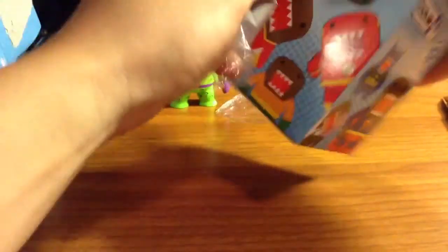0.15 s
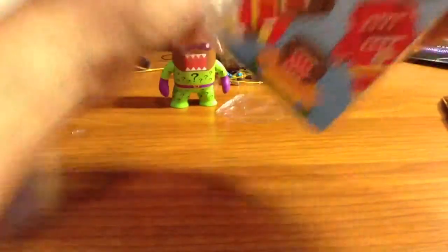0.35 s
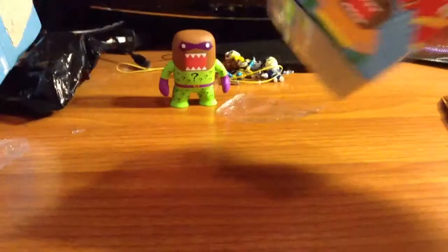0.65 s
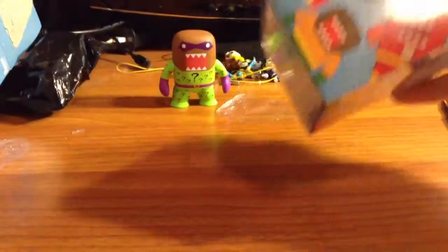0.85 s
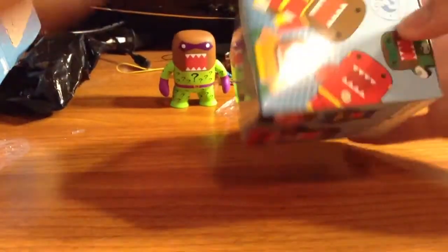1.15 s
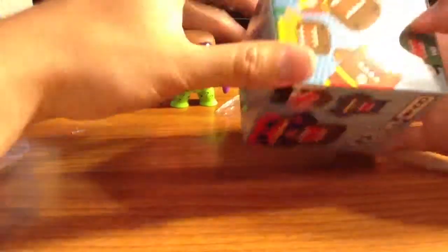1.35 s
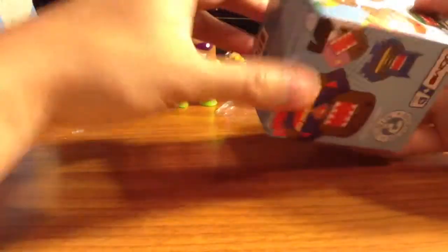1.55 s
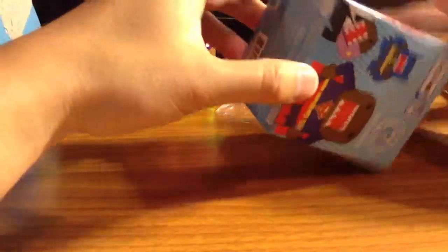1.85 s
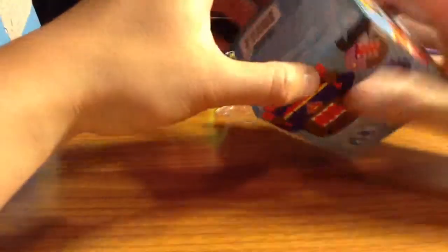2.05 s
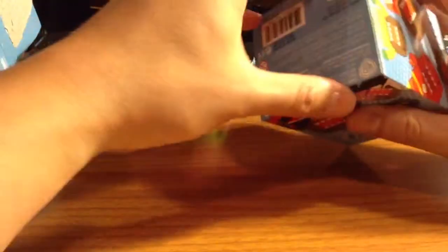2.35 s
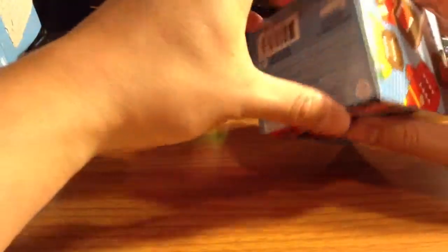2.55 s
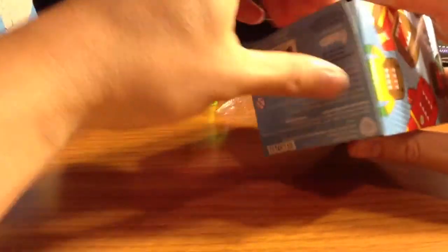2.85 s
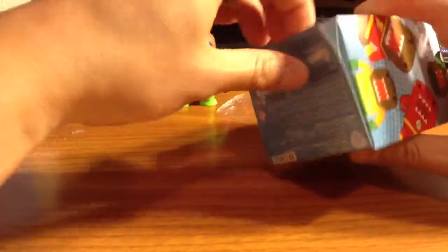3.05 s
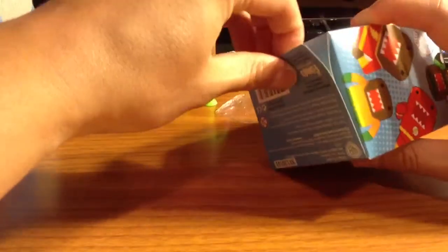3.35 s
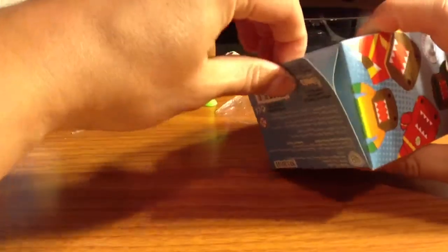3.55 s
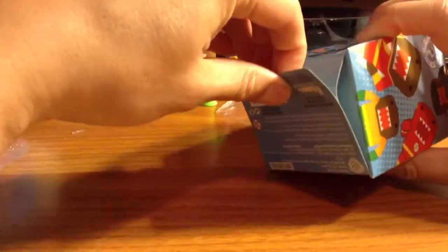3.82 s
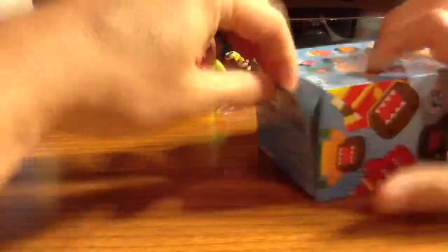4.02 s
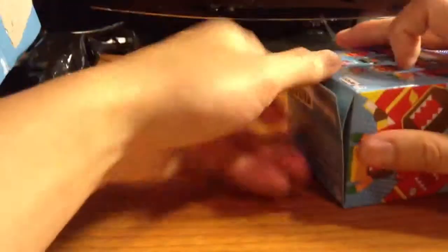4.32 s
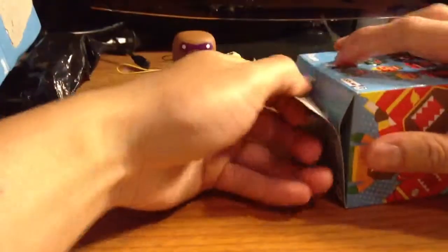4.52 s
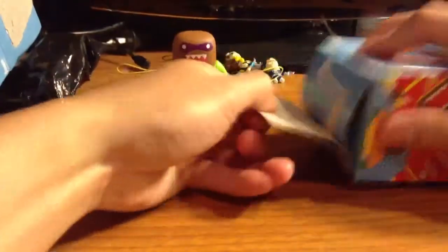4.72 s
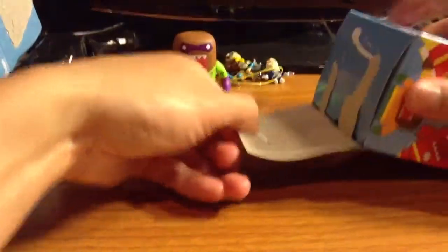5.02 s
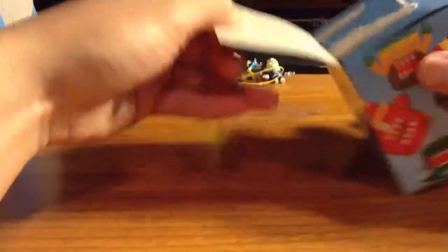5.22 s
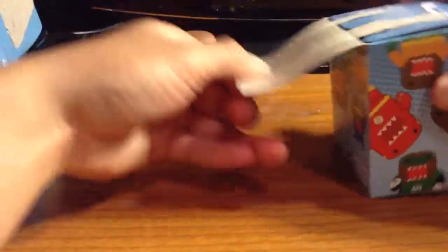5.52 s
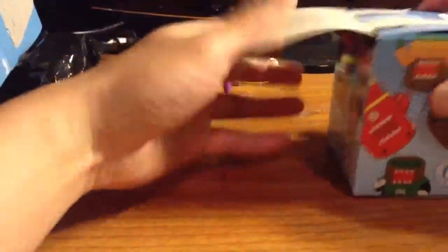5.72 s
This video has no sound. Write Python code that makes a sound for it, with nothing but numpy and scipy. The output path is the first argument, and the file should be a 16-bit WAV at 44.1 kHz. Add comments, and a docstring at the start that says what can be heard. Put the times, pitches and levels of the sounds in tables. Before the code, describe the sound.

Busy plastic crackling, quiet box handling and thumb picks, a sharp snap with a pop, hollow thuds, then a loud two-part cardboard tear.

```python
"""In a small room, close by, hands pull crinkly film off a cardboard box and rip open its glued flap.
Creases, picked edges and glue spots snap as noise bursts; blows ring the modes of the hollow box.
Rubbing is grainy friction noise heard through film, card and box; the freed flap hisses and rings, and once pops.
Near surfaces echo, a decaying noise tail gives the room's answer, and quiet room tone lies beneath."""
import sys
import numpy as np
from scipy import signal
from scipy.fft import rfft, irfft, next_fast_len
from scipy.io import wavfile
from scipy.ndimage import map_coordinates

SR = 44100
rng = np.random.default_rng(int(sys.argv[2]) if len(sys.argv) > 2 else 0)


def wrap_up_sound(samples):
    """Save the sound to the file named by the first command line argument, as 16-bit audio."""
    columns = np.atleast_2d(samples).T
    # keep every value between -1 and 1, then stretch to whole-number steps
    tamed = np.clip(columns, -1, 1)
    steps = np.round(tamed * 32767).astype(np.int16)
    wavfile.write(sys.argv[1], SR, steps)


N = 259308  # length in samples


def amp(db):
    """Decibel law: 20 dB is a factor of ten in amplitude."""
    return 10 ** (np.asarray(db) / 20)


def unit(x):
    """Normalisation to a root-mean-square value of one."""
    return x / np.sqrt(np.mean(x ** 2) + 1e-20)


def along(points, hz):
    """Logarithmic pitch scale: (Hz, value) points joined by straight lines over log frequency."""
    point_hz, value = np.transpose(points)
    return np.interp(np.log(hz + 1), np.log(point_hz + 1), value)


def filtered(x, response):
    """Linear filtering: the zero-padded spectrum times a complex response of frequency."""
    size = next_fast_len(N + 8192)
    hz = np.fft.rfftfreq(size, 1 / SR)
    return irfft(rfft(x, size) * response(hz), size)[:N]


def coloured(x, spectrum):
    """Spectral shaping: a zero-phase gain drawn through (Hz, dB) points."""
    return filtered(x, lambda hz: amp(along(spectrum, hz)))


def resonant(x, peaks):
    """Parallel resonance: second-order band-passes (Hz, width Hz, dB) added with alternating sign."""
    def response(hz):
        total = 0
        for k, (centre, width, db) in enumerate(peaks):
            damping = 1j * hz * width
            total = total + (-1) ** k * amp(db) * damping / (centre ** 2 - hz ** 2 + damping)
        return total
    return filtered(x, response)


def wobble(rate):
    """Slow random modulation: a smooth curve through normal deviates, rate knots a second."""
    knots = rng.standard_normal(int(N * rate / SR) + 4)
    return map_coordinates(knots, [np.arange(N) * rate / SR])


def grainy(per_s, spread_db, t60, smooth):
    """Stick-slip friction: noise lit by random slips of bounded size, each dying in t60 s, over a smooth share."""
    chance, size, noise = rng.random(N), rng.exponential(size=N), rng.standard_normal(N)
    slips = (chance < per_s / SR) * amp(spread_db * np.minimum(size, 3))
    decay_per_sample = amp(-60 / (t60 * SR))
    glow = signal.lfilter([1], [1, -decay_per_sample], slips)
    return noise * (unit(glow) + smooth)


# Room tone spectrum. Each row: frequency in Hz, relative level in dB.
AIR_SPECTRUM = [(25, -34), (60, -16.5), (125, -4.5), (260, 4.5), (500, -3.5), (1300, -9.5), (2500, -14.5),
                (8000, -27.5), (17000, -25)]


def room_tone():
    """Steady broadband noise: shaped by the room-tone spectrum, its level wandering a little."""
    level_db = -59.5 + 2.34 * wobble(5.29)
    return amp(level_db) * unit(coloured(rng.standard_normal(N), AIR_SPECTRUM))


# Reverberation. Each row: frequency in Hz, time to fall 60 dB in seconds.
ROOM_T60 = [(200, 0.18), (1000, 0.17), (3000, 0.18), (8000, 0.27), (15000, 0.11)]
# Table top and near walls. Each row: delay in seconds, level in dB before the echo's treble tilt.
WALLS = [(.0023, -18), (.0047, -24), (0.01, -27.5), (0.0132, -28.5), (.0231, -44)]


def room(x, wet_db):
    """Reflection and reverberation: discrete echoes, then a decaying noise tail, drawn anew each quarter second."""
    out, step = np.zeros(N + SR), SR // 4
    out[:N] = x
    bright_echo = coloured(x, [(300, -68), (3000, 7.5)])
    for delay, db in WALLS:
        out[round(delay * SR):][:N] += amp(db) * bright_echo
    for k in range(0, N, step):
        hz, t, bins = signal.stft(rng.standard_normal(SR // 3), SR, nperseg=256)
        fading = bins * amp(-60 * t / along(ROOM_T60, hz)[:, None])
        tail = signal.istft(fading, SR, nperseg=256)[1]
        wet = signal.fftconvolve(x[k:k + step], tail / np.linalg.norm(tail))
        out[k + SR // 200:][:len(wet)] += amp(wet_db) * wet  # 5 ms later
    return out[:N]


# Resonances of the bent flap. Each row: frequency in Hz, width in Hz, relative level in dB.
CARD_PEAKS = [(1500, 920, 5), (2470, 413, 8.5), (3144, 785, 5.5)]


def card(x):
    """Plate resonance: the card passes sound through its own broad peaks."""
    return resonant(x, CARD_PEAKS)


# Colour of film crackle. Each row: frequency in Hz, relative level in dB.
FILM_SPECTRUM = [(1500, -48), (2600, -5), (3300, -11), (4800, 0), (7000, 0.5), (10000, 1), (13000, 1),
                 (17000, -4.5)]


def sliding(grit):
    """Radiation by the rubbed sheet: friction grit heard through film (rustle) and through card (rasp)."""
    rustle = amp(-5.5) * unit(coloured(grit, FILM_SPECTRUM))
    rasp = amp(-6.0) * unit(card(grit))
    return np.array([rustle, rasp])


# Hands resting and shifting on the box.
# Each row: time in seconds, relative rustle in dB, relative box rumble in dB.
HOLD = [(0, -45.5, -48), (0.5, -51.5, -58), (0.9, -57.5, -62.5), (1.12, -63.5, -78), (1.8, -65, -62),
        (2.3, -71.5, -63), (2.7, -74, -68), (3.0, -56, -49), (3.15, -56, -51), (3.3, -60, -54.5),
        (3.7, -55.5, -52.5), (3.9, -57, -55.5), (4.4, -59.5, -56), (4.63, -62.5, -57.5),
        (5.04, -56.5, -51.5), (5.15, -50, -52.5), (5.42, -55.5, -52.5), (5.6, -56, -57.5),
        (5.88, -54.5, -50.5)]
# Pulls and rubs. Each row: start in seconds, length in seconds, relative rustle in dB,
# relative box rumble in dB, paper rasp in dB above the rustle.
STROKES = [(0, 0.033, -36, -30.5, -12), (0.097, .12, -56, -38.5, -6), (0.226, 0.041, -27, -50, -11),
           (0.284, 0.1, -36.5, -43.5, 0.5), (0.357, 0.098, -33.5, -35.5, -3.5),
           (0.546, 0.13, -34.5, -44.5, -5.5), (0.66, 0.17, -43, -54, -3.5), (1.013, 0.069, -56, -51, 8),
           (1.302, 0.13, -63, -45.5, 8), (1.592, 0.16, -69.5, -54, 11), (1.86, 0.14, -56.5, -47, 4),
           (1.97, .26, -54, -44.5, 2.5), (2.473, 0.022, -59, -72, 4.5), (3.77, 0.054, -56.5, -61, 4),
           (3.95, 0.11, -46, -44.5, -5), (4.02, .09, -56, -37, -2), (4.189, 0.073, -52, -49, 1.5),
           (4.532, 0.056, -50, -46.5, -3), (5.692, 0.11, -49, -41, 7)]
# The glued seam rips in two pulls. Each row: start in seconds, length in seconds, relative rustle in dB,
# relative box rumble in dB, paper rasp in dB above the rustle.
RIPS = [(4.68, 0.14, -19.5, -31.5, -4.5), (4.872, 0.11, -22.5, -33, -3.5)]
HOLD_RASP_DB = -1  # paper rasp over the rustle
# For each kind: share of the length spent rising, rise in dB, sag in dB while held
STROKE_SHAPE, RIP_SHAPE = (0.3, 9.9, 5.3), (0.35, 19.3, 9.2)
RELEASE_DB_PER_S = 703


def effort():
    """Force envelopes: rustle, rasp and rumble gains for the hold, and for strokes that rise, sag and let go."""
    t = np.arange(N) / SR
    s, rustle_db, rumble_db = np.transpose(HOLD)
    levels_db = (rustle_db, rustle_db + HOLD_RASP_DB, rumble_db)
    hold = amp([np.interp(t, s, level_db) for level_db in levels_db])
    strokes = np.zeros_like(hold)
    for table, (rise, rise_db, sag_db) in ((STROKES, STROKE_SHAPE), (RIPS, RIP_SHAPE)):
        for start, length, rustle_db, rumble_db, rasp_db in table:
            times = [-.005, 0, rise * length, length, length + .2]
            shape_db = np.interp(t - start, times,
                                 [-120, -rise_db, 0, -sag_db, -sag_db - RELEASE_DB_PER_S * .2])
            peaks_db = [[rustle_db], [rustle_db + rasp_db], [rumble_db]]
            strokes = np.hypot(strokes, amp(peaks_db + shape_db))  # overlapping strokes add in power
    return hold, strokes


# Wall and air modes of the box. Each row: frequency in Hz, relative level in dB.
BOX_MODES = [(175, -20), (270, 6.5), (360, -2), (452, 4.5), (520, -1), (650, 5.5), (800, 5.5), (890, 7),
             (1160, 6), (1390, 9.5), (1800, 7), (2330, 6), (3240, 5)]
# Colour of the rubbed box. Each row: frequency in Hz, relative level in dB.
HOLLOW_SPECTRUM = [(30, -23), (90, -2.5), (200, 6.5), (300, 0.5), (500, 3), (850, -1), (1300, -11.5),
                   (2200, -18), (4000, -36)]


def handling():
    """Friction-driven vibration: film, paper fibres and skin slide on the box and set its walls humming."""
    hold, strokes = effort()
    skin = amp(3.0 * wobble(20)) * grainy(300, 2.8, 0.0067, 1.36)
    fibres = amp(2.03 * wobble(33)) * grainy(450, 9.2, 0.005, 1.0)
    crackle = grainy(90, 4.2, 0.0069, 0.05)
    grit = unit(fibres) + amp(-11.5) * crackle
    uneven = amp(1.8 * wobble(30))
    rubbing = coloured(uneven * grainy(220, 0.76, 0.035, 0.93), HOLLOW_SPECTRUM)
    damped_modes = [(hz, 0.2 * hz, db) for hz, db in BOX_MODES]
    hum = unit(0.75 * rubbing + resonant(rubbing, damped_modes))
    rustle_and_rasp = hold[:2] * sliding(skin) + strokes[:2] * sliding(grit)
    return rustle_and_rasp.sum(0) + amp(-4.0) * np.hypot(hold[2], strokes[2]) * hum


# The freed flap springs back along the card.
# Each row: time in seconds, hiss in dB, flap ring in dB, time to fall 60 dB in seconds.
SPRINGBACK = [(2.692, -54, -58, 0.24), (3.042, -37, -36.5, 0.18), (3.509, -32, -51, 0.36),
              (4.018, -46, -58, 0.077)]
# The flap's ring. Each row: frequency in Hz, width in Hz, relative level in dB.
FLAP_PEAKS = [(3350, 460, 6), (4960, 530, -15)]


def springback():
    """Free decay: a smooth hiss and the flap's noisy ring die exponentially after each release."""
    t, noise = np.arange(N) / SR, rng.standard_normal((2, N))
    hiss, ring = unit(coloured(noise[0], FILM_SPECTRUM)), unit(resonant(noise[1], FLAP_PEAKS))
    out = np.zeros(N)
    for s, hiss_db, ring_db, t60 in SPRINGBACK:
        fade = (t > s) * amp(-60 * np.abs(t - s) / t60)
        out += fade * (amp(hiss_db) * hiss + amp(ring_db) * ring)
    return out


# The flap springs off the thumb. The row: relative level in dB, air pitch in Hz, time to fall 60 dB in seconds.
POP = (-3.5, 152, 0.026)
POP_S = 3.51  # start in seconds


def pop():
    """Cavity resonance: a short suck of air, then the air in the box swings a few times."""
    db, air_hz, t60 = POP
    t = np.maximum(np.arange(N) / SR - POP_S, 0)
    suck = -2.7 * t / 0.00034 * np.exp(-t / 0.00051)
    swing = 1.28 * amp(-60 * t / t60) * np.sin(2 * np.pi * air_hz * t)
    return amp(db) * (suck + swing)


# Blows on the box, and a short squeak near 2900 Hz around 4.4 s.
# Each row: time in seconds, relative peak in dB, pitch in Hz about which the modes are strongest.
KNOCKS = [(0.046, -26, 865), (0.098, -18.5, 730), (.1057, -28, 430), (0.17, -20.5, 940), (0.2696, -26, 900),
          (0.3112, -30, 650), (0.3857, -23, 710), (.42, -19.5, 1650), (.436, -20.5, 750),
          (0.5436, -33.5, 310), (.575, -42, 300), (.632, -43, 269), (0.668, -35.5, 430), (.705, -40.5, 302),
          (.7836, -39, 825), (0.9659, -31.5, 1810), (1.3162, -30.5, 1860), (1.3534, -29, 760),
          (1.3658, -25, 810), (1.414, -28.5, 840), (1.429, -39, 900), (1.555, -48, 2300), (1.636, -44, 664),
          (1.9, -24.5, 420), (1.906, -28.5, 267), (2.01, -39, 700), (2.05, -42, 1090), (2.0984, -29.5, 850),
          (2.1604, -20.5, 1080), (2.6915, -26, 880), (3.0406, -37.5, 1600), (3.1269, -37.5, 454),
          (3.1589, -35.5, 460), (3.2068, -43.5, 527), (3.241, -33, 483), (3.319, -37, 453),
          (3.363, -41, 1360), (4.0169, -10.5, 670), (4.0233, -7, 440), (4.0399, -35, 1150),
          (4.219, -37.5, 1080), (4.383, -53, 2900), (4.4, -43, 2920), (4.417, -44, 2900),
          (4.5146, -35.5, 715), (4.5608, -34, 684), (4.6826, -29.5, 1140), (4.7044, -15.5, 1300),
          (4.7353, -21, 724), (4.7817, -22.5, 1460), (4.9083, -33, 1680), (4.9576, -20, 1020),
          (5.0562, -31, 860), (5.373, -40, 900), (5.725, -27, 1500), (5.735, -36.5, 766),
          (5.7706, -33.5, 650), (5.8041, -30.5, 1420)]
# Decay time in seconds at a reference pitch in Hz; it falls as this power of pitch
KNOCK_T60, KNOCK_HZ, KNOCK_DAMPING = 0.03, 794, 0.47
MODE_SCATTER_DB = 3


def knocks():
    """Modal vibration: a blow rings the modes near the pitch the grip leaves free; high modes die sooner."""
    out, t = np.zeros(N + SR), np.arange(SR // 5) / SR
    hz, level_db = np.transpose(BOX_MODES)[..., None]
    draws = rng.standard_normal((len(KNOCKS), 2, len(BOX_MODES), 1))
    for (s, db, free_hz), (scatter, side) in zip(KNOCKS, draws):
        t60 = KNOCK_T60 * (KNOCK_HZ / free_hz) ** KNOCK_DAMPING
        grip_loss_db = 10.1 * np.abs(np.log2(hz / free_hz))
        share = np.sign(side) * amp(level_db - grip_loss_db + MODE_SCATTER_DB * scatter)
        decay = amp(-60 * t / t60 * (hz / free_hz) ** 0.63)
        modes = share * decay * np.sin(2 * np.pi * hz * t)
        ring = modes.sum(0) * (1 - np.exp(-t * free_hz / 0.15))  # a lower knock is a softer contact
        out[round(s * SR):][:len(t)] += amp(db - 1.0) * ring / np.abs(ring).max()
    return out[:N]


# Film creases letting go. Each row: time in seconds, relative burst peak in dB, card share in dB.
CREASES = [(.023, -29, -24), (.0279, -25, -18), (.0444, -28, -14), (.0698, -33, -22), (.0758, -28, -29),
           (.0973, -24, -4.5), (.1124, -23.5, -2), (.124, -30, -13), (.1338, -12.5, -10.5),
           (.1601, -40, -17), (.1666, -20.5, -1), (.3055, -21, -4), (.3102, -23, -8), (.3315, -27, 0),
           (.3647, -10.5, -21), (.3947, -18, -14), (.4087, -20, -24), (.4171, -21.5, -17),
           (.4358, -17, -9.5), (.4884, -42, -11), (.5075, -34.5, -5), (.5339, -32, 0), (.5642, -26, -14),
           (.5742, -26, -6), (.6075, -18, -13), (.6302, -24, -9), (.667, -30.5, 2), (.6929, -17.5, -21),
           (.767, -27, -12), (.8371, -32, -4), (.904, -32, -8), (.967, -34.5, 0.5), (1.431, -42, -18)]
# Picks at the flap's edge; 3.053 and 3.522 s are echoes of the snaps just before.
# Each row: time in seconds, relative burst peak in dB, card share in dB.
PICKS = [(2.1626, -36.5, 3), (2.5088, -46, -9), (2.6934, -23.5, -15), (3.0423, -8, -13.5), (3.053, -30, -9),
         (3.2064, -30.5, -17), (3.2542, -37.5, -32), (3.3166, -43.5, -5), (3.446, -35, -23),
         (3.4603, -27.5, -21), (3.4956, -26, -26), (3.509, -14.5, -22), (3.522, -21.5, -7),
         (3.66, -37, -16), (3.7943, -33, -31), (3.8172, -33.5, -20), (3.872, -56, 15), (4.0173, -18, 5.5),
         (4.2154, -33.5, -7), (4.239, -40, -11), (4.3719, -40, -35), (5.2387, -38, -9), (5.265, -39.5, -13),
         (5.3778, -40, -4), (5.4232, -39, -11), (5.7529, -37, 3)]
# Glue spots tearing. Each row: time in seconds, relative burst peak in dB, card share in dB.
GLUE = [(4.673, -37, -18), (4.6819, -19, -5.5), (4.6941, -19, -7), (4.7051, -3.5, 0), (4.7169, -8, -0.5),
        (4.7349, -9, -4.5), (4.784, -17, -24), (4.8142, -24.5, -43), (4.8759, -29, -26), (4.886, -37, -9),
        (4.8946, -19, -12), (4.91, -19.5, -24), (4.9205, -13, -9), (4.957, -24.5, 7.5)]
# For each kind: brightness in dB before dulling, time to fall 60 dB in seconds
CREASE, PICK, TEAR = (-9, 0.0037), (-4.5, 0.0061), (1.3, 0.0071)
DULLING = 0.44  # dB of brightness lost per dB of card share
TICK_DB, TICK_CARD_DB = -28.5, 15.5  # the tick relative to its knock; its card share
SNAP_ATTACK_S = 0.00027


def snaps():
    """Sudden release of strain: noise bursts, bright in film and duller in card; knocks tick mostly in the card."""
    streams, t = np.zeros((3, N + SR)), np.arange(SR // 20) / SR
    rows = []
    for table, kind in ((CREASES, CREASE), (PICKS, PICK), (GLUE, TEAR)):
        rows += [(*row, *kind) for row in table]
    rows += [(s, db + TICK_DB, TICK_CARD_DB, 0, CREASE[1]) for s, db, _ in KNOCKS]
    for (s, db, card_db, bright_db, t60), noise in zip(rows, rng.standard_normal((len(rows), len(t)))):
        bright_db -= DULLING * card_db
        burst = noise * amp(-60 * t / t60) * (1 - np.exp(-t / SNAP_ATTACK_S))
        burst *= amp(db + 3.5) / np.abs(burst).max()
        gains = amp([[-bright_db / 2], [bright_db / 2], [card_db]])
        streams[:, round(s * SR):][:, :len(t)] += gains * burst
    film_low, film_high, in_card = streams[:, :N]

    def above_split(hz):
        return 1 / (1 + (9500 / (hz + 1)) ** 6)

    film = filtered(film_low, lambda hz: 1 - above_split(hz)) + filtered(film_high, above_split)
    return amp(-0.5) * coloured(film, FILM_SPECTRUM) + amp(2.5) * card(in_card)


def scene():
    """Superposition: each group of sources with its own share of room, over the room tone."""
    rubbing = room(handling() + springback(), wet_db=-14)
    popping = room(pop(), wet_db=-31)
    knocking = room(knocks(), wet_db=-13.5)
    snapping = room(snaps(), wet_db=-12.5)
    return (room_tone() + rubbing + popping + knocking + snapping)[None]


def record(dry):
    """Band-limited recording: bass is thinned, loud peaks are rounded, and the highest treble is cut."""
    top = [(15250, 0), (15450, -18), (16500, -18), (17100, -40)]  # (Hz, dB)
    top_hz, corner_hz, shelf_hz = 17146, 140, 30  # band limit; bass loss begins and levels out
    x = filtered(dry[0], lambda hz: ((1j * hz + shelf_hz) / (1j * hz + corner_hz)) ** 2)
    x = x / (1 + np.abs(x / .8) ** 4) ** (1 / 4)  # peaks bend toward 0.8
    return filtered(x, lambda hz: amp(along(top, hz)) * (hz < top_hz))[None]


dry = scene()
out = record(dry)
wrap_up_sound(out)
```